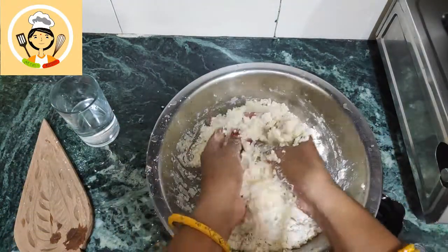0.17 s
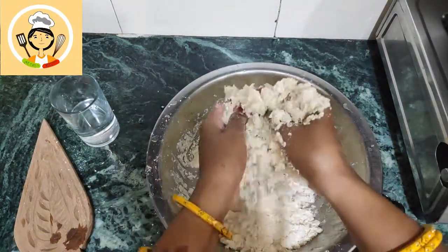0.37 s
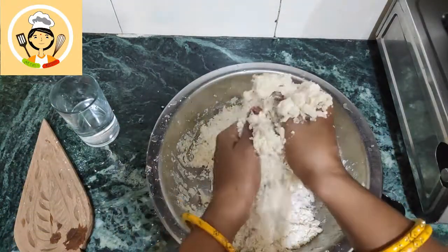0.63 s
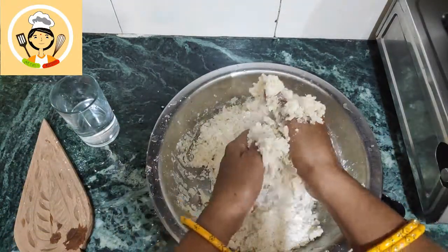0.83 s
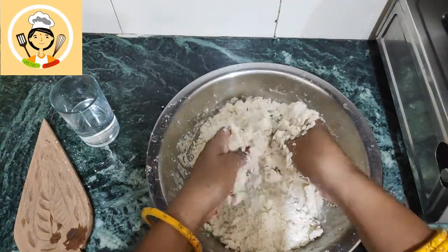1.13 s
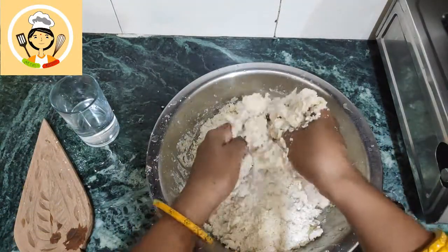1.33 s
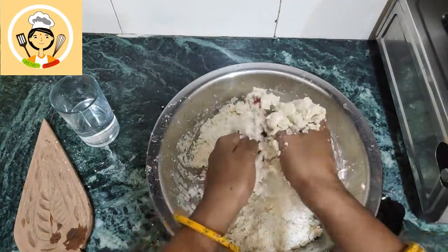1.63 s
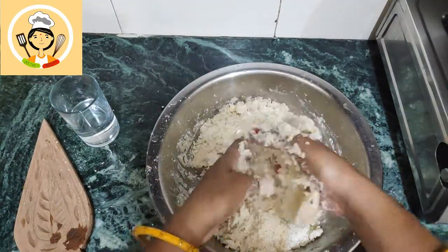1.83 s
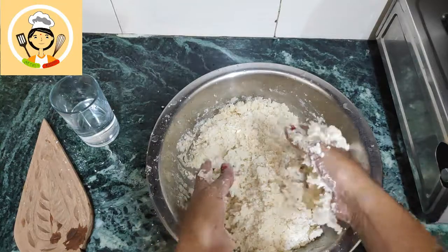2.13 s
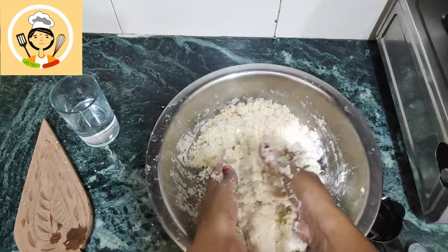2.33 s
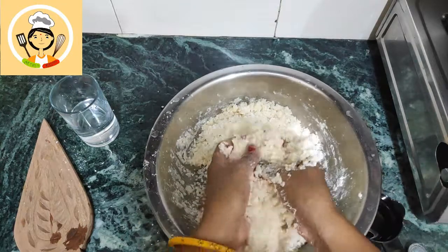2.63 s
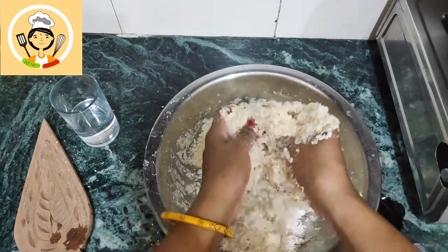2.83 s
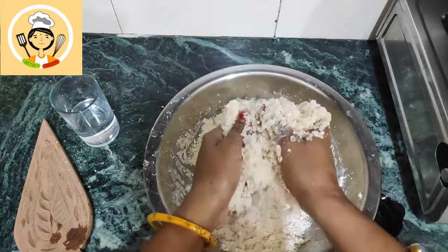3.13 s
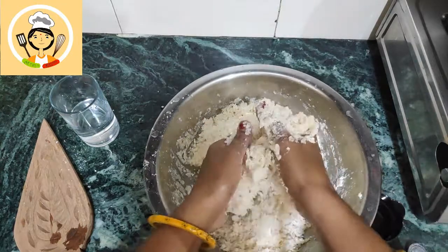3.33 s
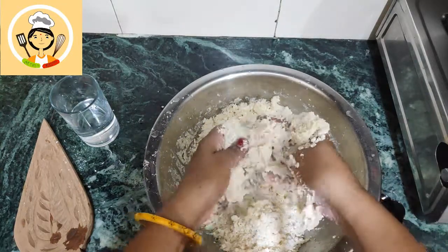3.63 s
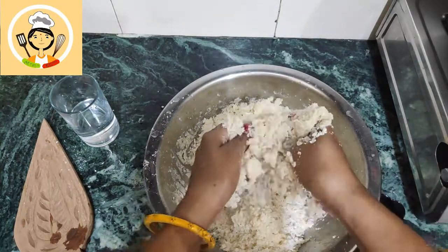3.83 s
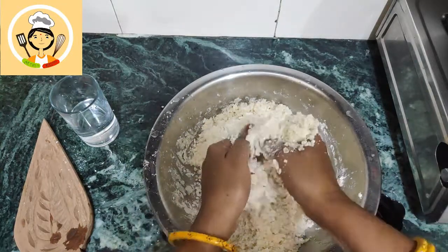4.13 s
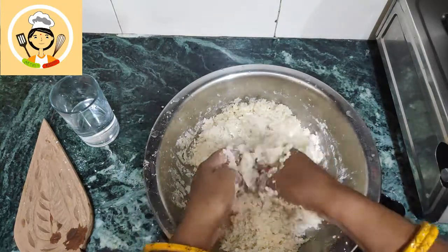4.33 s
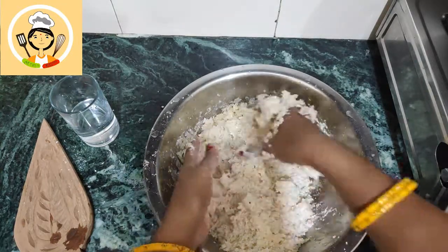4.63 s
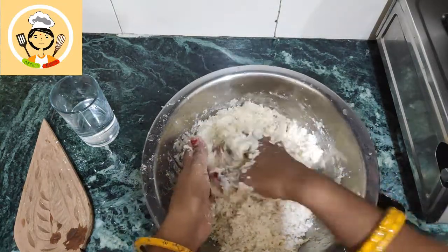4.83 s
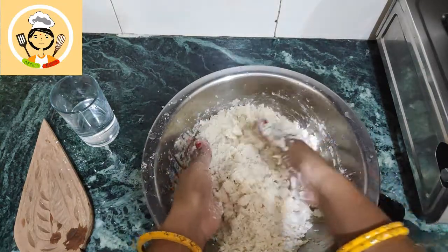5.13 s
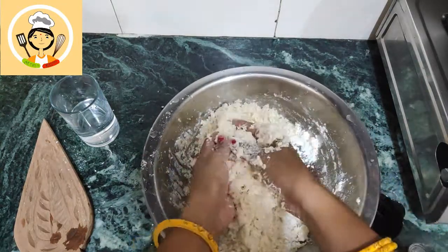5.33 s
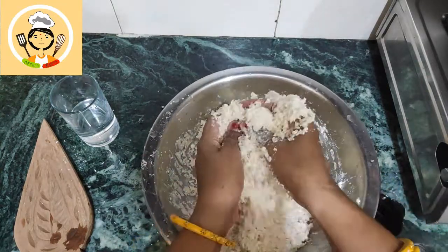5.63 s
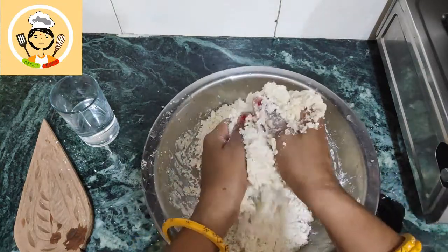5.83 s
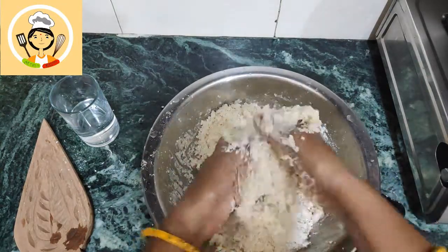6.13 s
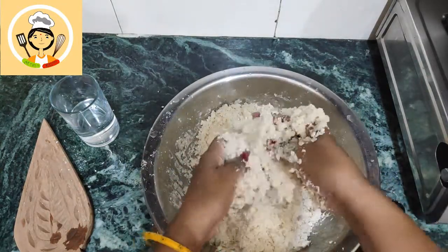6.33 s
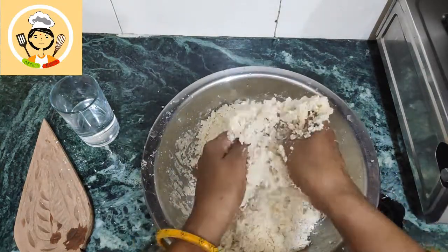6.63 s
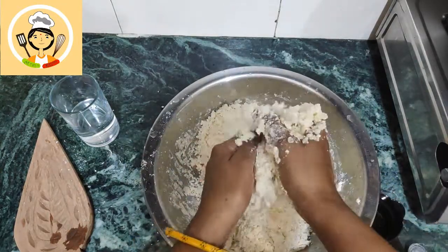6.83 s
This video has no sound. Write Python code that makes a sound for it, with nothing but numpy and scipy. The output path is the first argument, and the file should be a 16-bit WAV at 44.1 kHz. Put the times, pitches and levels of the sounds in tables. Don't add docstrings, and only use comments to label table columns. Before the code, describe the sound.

Two hard metallic clangs ring from a steel bowl, then hands softly rub crumbly flour mix with small ticks and clinks, ending in heavy scrapes on stone.

```python
import sys
import numpy as np
from scipy import signal
from scipy.fft import rfft, irfft, next_fast_len
from scipy.io import wavfile
from scipy.ndimage import uniform_filter1d

SR = 44100
rng = np.random.default_rng(int(sys.argv[2]) if len(sys.argv) > 2 else 0)


def boost_factor(decibels):
    exponent = np.asarray(decibels, float) / 20
    return 10 ** exponent


def log_audio(samples):
    frames = np.atleast_2d(samples).T
    limited = np.clip(frames, -1, 1)
    pcm = np.round(limited * 32767).astype(np.int16)
    wavfile.write(sys.argv[1], SR, pcm)


N = 307893


def evened(x):
    return x / np.sqrt(np.mean(x ** 2) + 1e-20)


def read(points, hz):
    f, value = np.transpose(points)
    return np.interp(np.log(hz + 1), np.log(f + 1), value)


def add(mix, s, sound):
    part = mix[round(s * SR):][:len(sound)]
    part += sound[:len(part)]


def coloured(x, points):
    size = next_fast_len(len(x) + 2048, real=True)
    gain = boost_factor(read(points, np.fft.rfftfreq(size, 1 / SR)))
    return irfft(rfft(x, size) * gain, size)[:len(x)]


# (frequency [Hz], level [dB per Hz])
HUM_COLOUR = [(30, -61), (62, -48), (80, -26), (134, -11), (254, -11), (420, -4), (545, -2), (680, -11),
              (950, -6), (1080, -10), (1250, -18.5), (2200, -24), (3800, -21), (4800, -31.5), (6500, -35.5)]
# (frequency [Hz], depth [dB])
HUM_DRIFT = [(500, 1.6), (1200, 3.2), (4000, 2.8), (5500, 1.5)]
# (frequency [Hz], width [Hz], level [dB])
ROOM_MODES = [(199.9, 17, 6), (326.6, 61, 1)]


def hum():
    frames, hz = N // 512 + 5, np.fft.rfftfreq(2048, 1 / SR)
    a, b, patches = rng.standard_normal((frames, 1025, 3)).T
    patches = uniform_filter1d(patches, 12, 0)
    patches = evened(uniform_filter1d(patches, 6, 1))
    modes = sum(boost_factor(db) / (1 + (2 * (hz - f) / width) ** 2) for f, width, db in ROOM_MODES)
    shape = boost_factor(read(HUM_COLOUR, hz)) + modes
    drift = boost_factor(read(HUM_DRIFT, hz)[:, None] * patches)
    z = (a + 1j * b) * shape[:, None] * drift
    return boost_factor(-61.8) * evened(signal.istft(z, nperseg=2048, noverlap=1536)[1][:N])


# (frequency [Hz], level [dB])
HISS_COLOUR = [(4000, -34), (6500, 4.5), (14000, 3), (15000, -9)]


def hiss():
    mid, side = (evened(coloured(x, HISS_COLOUR)) for x in rng.standard_normal((N, 2)).T)
    return boost_factor(-98.5) * (mid + boost_factor(-2) * np.outer([1, -1], side))


def rings(hz, db, t60, t, scatter_db):
    luck = rng.standard_normal((len(hz), 2))
    decay_db = (db + scatter_db * luck[:, 0])[:, None] - 60 * np.outer(1 / np.maximum(t60, .01), t)
    fade = np.float32(decay_db * np.log(10) / 20)
    turn = np.float32(2 * np.pi * np.outer(hz, t) + luck[:, 1:])
    x = (np.exp(fade) * np.sin(turn)).sum(0)
    return x / abs(x).max()


LOW_HZ = [600, 704, 730, 802, 858, 961, 1044]
MIDDLE_HZ = [1400, 1553, 1761, 2093, 2223, 2353, 2487, 2513, 2866, 3262, 3386]
HIGH_HZ = [3736, 3985, 4044, 4160, 4199, 4269, 4320, 4487, 4800, 4985, 5052, 5105, 5280, 5965, 6130]
# (level [dB], t60 [s])
LOW_RING = [(-0.5, 0.11), (-4.5, 0.54), (-3, 0.41), (-13.5, 0.12), (-5.5, 0.75), (-2.5, 0.45),
            (-14.5, 0.77)]
MIDDLE_RING = [(-24.5, 0.59), (-10.5, .25), (-10.5, 0.2), (-7, 0.3), (-15.5, 0.1), (-24.5, 0.085),
               (-7, 0.18), (-5.5, 0.49), (1, 0.1), (-18.5, .33), (-22, 0.78)]
HIGH_RING = [(-14, .3), (-8, .25), (1, 0.16), (-9, 0.23), (-7, .3), (-6, .15), (-5.5, 0.22), (-9, 0.38),
             (-9, 0.13), (-6, 0.21), (-0.5, 0.056), (-8, 0.11), (-12, 0.083), (-16.5, 0.44), (-19, .2)]


def knock(db, low_db, middle_db, high_db, free):
    t = np.arange(int(.36 * SR)) / SR
    ring = np.zeros(len(t))
    for hz, modes, family_db in [(LOW_HZ, LOW_RING, low_db), (MIDDLE_HZ, MIDDLE_RING, middle_db),
                                 (HIGH_HZ, HIGH_RING, high_db)]:
        mode_db, t60 = np.transpose(modes)
        ring += boost_factor(family_db) * rings(hz, mode_db, free * t60, t, 1.8)
    ring *= .33 + .67 * np.exp(-t / .013)
    colour = [(400, low_db - 21), (800, low_db), (1250, middle_db - 15.5), (2400, middle_db),
              (5000, high_db), (6200, high_db - 15), (8500, high_db - 15), (12500, high_db - 11)]
    crack_and_clang = np.exp(-t / .006) + .22 * np.exp(-t / (.05 * free))
    snap = coloured(rng.standard_normal(len(t)), colour) * crack_and_clang
    x = ring / abs(ring).max() + .7 * snap / abs(snap).max()
    return boost_factor(db) * x / abs(x).max() * (1 - np.exp(-t / .0005))


# (time [s], peak level [dB], low modes [dB], high modes [dB], freedom to ring [0-1])
KNOCKS = [(.0097, -10.5, -8, 7.5, 0.8), (.0155, -21.5, -5.5, 0, .7), (.0898, -7.8, -10.5, 6.5, 0.4),
          (0.418, -42.5, -2, 3.5, .6), (2.578, -41, 7.5, -22, 0.86), (2.638, -51, -28, -8, 0.87),
          (4.786, -24, -.5, -14, 1), (4.802, -30.5, 5, -18, 0.75), (5.2807, -29, -2, -10, .8),
          (5.346, -38.5, -3, -9, 0.4), (5.487, -43, -3, -8, 0.7), (5.524, -48, -14, 10, 0.05)]
# (frequency [Hz], level [dB])
BOWL_GAPS = [(1000, 0), (1200, -10), (1450, 1.5), (3000, -5), (3550, -3.5), (4000, 0), (5150, -1),
             (5600, -9.5)]


def bowl_knocks():
    out = np.zeros(N)
    for s, db, low_db, high_db, free in KNOCKS:
        add(out, s, knock(db, low_db, 0, high_db, free))
    return coloured(out, BOWL_GAPS + [(6100, 0.00036)])


def struck(db, hz, t60):
    t = np.arange(int(np.clip(t60, .05, .6) * SR)) / SR
    return boost_factor(db - 60 * t / t60) * np.sin(2 * np.pi * hz * t) * (1 - np.exp(-t / .001))


def low_thud():
    out = np.zeros(N)
    add(out, .011, struck(-48, 280, .15))
    return out


# (time [s], peak level [dB], frequency [Hz], t60 [s])
SWEET_SPOTS = [(0.012, -22, 2513, 0.085), (.0905, -31, 2514, .15), (4.787, -46, 1556, .2),
               (4.787, -49, 1760, .2), (.011, -32, 4064, .1), (0.092, -25, 2866, 0.1),
               (.0905, -35, 2092, 0.15), (.0905, -36, 4324, 0.084), (4.786, -47.5, 2092, 0.21),
               (4.786, -38.5, 2866, 0.067), (2.578, -59, 2092, 0.12), (2.578, -67, 2866, 0.081),
               (5.2815, -44.5, 2100, .12), (5.2815, -45, 2870, 0.14), (.0905, -37.5, 5130, 0.17),
               (.0905, -39, 859, .3), (0.0908, -46, 1759, 0.2), (4.79, -44.5, 860, .7),
               (4.79, -43, 958, .3), (4.79, -45, 705, .3), (5.282, -50, 721, .25), (5.282, -52, 965, .4),
               (1.1842, -69.5, 2513, 0.079), (1.1842, -70.5, 2866, .25), (2.578, -62, 3262, 0.095),
               (2.578, -70.5, 5105, 0.089), (2.578, -63, 2513, 0.1), (4.786, -49.5, 4320, 0.21),
               (4.786, -59, 5052, 0.28), (4.786, -86, 6130, 0.2), (5.487, -53, 2513, 0.068),
               (5.346, -46, 2093, .07), (4.786, -31, 2507, 0.089), (5.2814, -35, 4307, 0.08),
               (5.2818, -41, 2505, 0.1), (5.487, -62, 2100, 0.25), (5.49, -72, 6130, .25),
               (4.786, -66, 6130, .2), (.012, -34, 2866, .1), (.012, -40, 4800, .08),
               (.0905, -41, 4807, .12), (.5906, -67, 6130, .15), (.5906, -62, 5150, .12),
               (.5906, -54, 3290, .1), (.355, -58, 2513, .2), (.355, -60, 2866, .2), (.4, -58, 1553, .25),
               (2.578, -64, 4044, .06), (.8465, -66, 2513, .15), (1.2, -68, 2866, .3),
               (3.585, -66, 2740, .2), (1.924, -60, 2866, .1), (1.926, -65, 2093, .1)]


def sweet_spots():
    out = np.zeros(N)
    for s, db, hz, t60 in SWEET_SPOTS:
        add(out, s, struck(db, hz, t60))
    return out


# (frequency [Hz], t60 [s])
KITCHEN_DECAY = [(500, 0.59), (2000, .4), (4000, 0.32), (7000, 0.22), (12000, .3)]


def kitchen(x):
    taps = np.zeros(SR // 2)
    at = np.arange(150, len(taps) - 20, 20)
    taps[at + rng.integers(0, 20, len(at))] = rng.choice([-1., 1.], len(at))
    hz, t, z = signal.stft(taps, SR, nperseg=256)
    decay = boost_factor(-60 * t / read(KITCHEN_DECAY, hz)[:, None])
    tail = signal.istft(z * decay, SR, nperseg=256)[1]
    return signal.fftconvolve(x, tail / np.linalg.norm(tail))[:N]


def ping(db, hz, t60):
    t = np.arange(int(np.clip(.7 * t60, .05, .6) * SR)) / SR
    near_hz = hz + np.array([-95., -35., 0., 55.])
    near_db = np.array([-8., -4., 0., -4.])
    near_t60 = t60 * np.array([.7, 1, 1, .9])
    return boost_factor(db) * rings(near_hz, near_db, near_t60, t, 3.6) * (1 - np.exp(-t / 0.004))


def random_flickers(count=320):
    out = np.zeros(N)
    for when, pitch, size in rng.random((count, 3)):
        hz = 1150 * 4. ** pitch ** 2.3
        add(out, when * N / SR, ping(-74.5 - 1.6 * np.log(size), hz, .2))
    return out


def steel(x, db):
    hz, t = np.array(LOW_HZ + MIDDLE_HZ + HIGH_HZ), np.arange(int(.15 * SR)) / SR
    wall = np.sin(2 * np.pi * np.outer(t, hz)).sum(1) * boost_factor(-60 * t / .08)
    through = signal.fftconvolve(x, wall / np.linalg.norm(wall))[:N]
    return boost_factor(-1.5) * x + boost_factor(db) * through


def resonate(x, hz, width):
    turn = np.exp(2j * np.pi * np.cumsum(hz) / SR)
    f, t, z = signal.stft(x / turn, SR, nperseg=512, return_onesided=False)
    w = np.interp(t * SR, np.arange(len(x)), np.maximum(width, 100))
    narrowed = z / (1 + (2 * f[:, None] / w) ** 4)
    low = signal.istft(narrowed, SR, nperseg=512, input_onesided=False)[1]
    return (low[:len(x)] * turn).real


def grit(count):
    unevenness = evened(uniform_filter1d(rng.standard_normal(count), 150))
    return rng.standard_normal(count) * boost_factor(1.9 * unevenness)


def rub(rows):
    s, *columns = np.transpose(rows)
    t = np.arange(s[0], s[-1], 1 / SR)
    db, hz, width = (np.interp(t, s, c) for c in columns)
    x = evened(resonate(grit(len(t)), hz, width))
    return s[0], boost_factor(db - 0.5) * x * signal.windows.tukey(len(t), .06)


def flick(s, length, db, hz, width, rise, fade_db, sag_hz):
    return rub([(s, db - 12.5, hz, width), (s + rise, db, hz, width),
                (s + length, db + fade_db, hz - sag_hz * length, width)])


# (time [s], length [s], level [dB],
# centre [Hz], width [Hz])
FLICKS = [(0.36, 0.24, -56.5, 3870, 2200), (.25, .4, -64, 2400, 1500), (1.918, .05, -61, 4400, 1100),
          (5.281, .2, -57, 3200, 3200), (4.787, .22, -56, 2300, 2000), (5.487, .25, -66, 3200, 2200),
          (2.225, .12, -65, 4300, 1100), (.3, 0.6, -66, 1600, 150), (1.27, 0.11, -63, 4140, 800),
          (1.955, 0.2, -62.5, 3820, 3500), (3.221, .13, -64, 3727, 500), (3.591, .14, -63.5, 3570, 500),
          (4.397, 0.1, -55.5, 3070, 2070), (1.86, 0.091, -68.5, 3900, 600), (3.17, .17, -68, 2330, 250),
          (4.8, 0.19, -56, 4300, 2000), (0.09, .3, -61.5, 4400, 5000)]


def quick_rustles():
    out = np.zeros(N)
    for row in FLICKS:
        add(out, *flick(*row, rise=0.0082, fade_db=-23, sag_hz=600))
    return out


# (time [s], length [s], level [dB], centre [Hz], width [Hz])
DRAGS = [
    (0.284, 0.057, -59.5, 4330, 2190),
    (0.982, .14, -71.5, 3900, 553),
    (2.23, 0.3, -62.5, 3993, 880),
    (2.246, 0.16, -75, 2630, 935),
    (2.964, 0.084, -65.5, 3620, 493),
    (3.107, 0.12, -70, 3680, 500),
    (4.687, 0.18, -64.5, 4200, 820),
    (5.077, 0.23, -59.5, 3930, 2170),
    (5.1, 0.11, -74.5, 6050, 900),
]


def finger_drags():
    out = np.zeros(N)
    shape = (0, -13), (0.37, 0), (0.92, 0), (1, -9.5)  # (part of the stroke, dB)
    sag_hz = 1570
    for s, length, db, hz, width in DRAGS:
        rows = [(s + u * length, db + d, hz - sag_hz * u * length, width) for u, d in shape]
        add(out, *rub(rows))
    return out


def tick(db, low_hz, high_hz, t60, tilt_db):
    t, luck = np.arange(int(.18 * SR)) / SR, rng.random((14, 2))
    hz = low_hz + (high_hz - low_hz) * (np.arange(14) + luck[:, 0]) / 14
    wall = np.array(MIDDLE_HZ + HIGH_HZ)
    nearest = wall[abs(hz[:, None] - wall).argmin(axis=1)]
    pulled = nearest + .1 * (hz - nearest)
    hz = np.sort(np.where(abs(nearest - hz) < 150, pulled, hz))
    octaves = np.log2(hz / 3900)
    colour_db = tilt_db * octaves - 9 * abs(octaves)
    band = [(.93 * low_hz, -50), *zip(hz, colour_db), (1.05 * high_hz, -50)]
    spray = coloured(rng.standard_normal(len(t)), band) * boost_factor(-60 * t / (3.8 * t60))
    click = (.35 + .65 * np.exp(-t / .005)) * (1 - np.exp(-t / .0003))
    modes = rings(hz, colour_db, t60 * (.5 + luck[:, 1]), t, 5.5)
    return boost_factor(db) * (.7 * modes + .65 * spray / abs(spray).max()) * click


# (time [s], peak level [dB], ring t60 [s], tilt [dB per octave])
BANGLE_ON_BANGLE = [
    (.3052, -58, .16, 0),
    (.3436, -45, 0.087, -2),
    (.3541, -39, 0.086, -8),
    (1.1189, -44.5, 0.14, -5),
    (2.0228, -45.5, .064, -20),
    (4.6713, -47, 0.16, -13),
]
BANGLE_ON_RIM = [
    (.5906, -42, .04, -8),
    (1.924, -39, 0.06, 7),
    (1.9565, -38, 0.11, -5),
    (3.0555, -45, 0.06, -7),
    (3.1028, -41, 0.068, -8),
    (4.1589, -51, .04, -5.5),
    (4.400, -34.5, 0.054, -11.5),
]
NAIL_IN_HOLLOW = [(.5472, -50.5, .41, 2), (2.7003, -45.5, 0.084, 2), (2.9018, -50, 0.07, 6),
                  (2.9297, -43, 0.07, 4), (3.2271, -49.5, .12, 16), (3.5089, -46, 0.16, -6),
                  (3.5833, -48.5, 0.043, -4), (5.7448, -55.5, 0.37, 19), (5.9145, -55, 0.35, 4.5),
                  (5.9399, -55.5, 0.125, 1), (5.606, -52, 0.091, -5), (2.2821, -58, .06, 0),
                  (2.329, -56, .06, 0), (2.4473, -54, .06, 0), (3.025, -62, .06, 0), (3.1392, -61, .08, 0),
                  (.401, -52, .06, 0)]
NAIL_ON_WALL = [
    (.8465, -53, 0.099, -11),
    (1.2431, -46.5, 0.25, -10),
    (2.153, -53.5, .065, -19),
    (2.2288, -52, 0.2, -18),
    (6.2088, -64.5, .11, 9),
    (.9827, -54, .12, 21),
]
RING_ON_WALL = [
    (1.185, -49, .11, 5),
    (1.2655, -48, .12, -.5),
    (5.232, -50, .12, 1),
    (5.259, -43, .12, -2.5),
    (6.3555, -43, .12, -6),
]
KNUCKLE = [
    (1.0365, -49.5, 0.26, -12.5),
]
# (ticks, lowest [Hz], highest [Hz])
CONTACTS = [(BANGLE_ON_BANGLE, 3480, 6300), (BANGLE_ON_RIM, 2080, 6450), (NAIL_IN_HOLLOW, 2800, 4350),
            (NAIL_ON_WALL, 3760, 5270), (RING_ON_WALL, 2300, 5260), (KNUCKLE, 1200, 2700)]


def contact_ticks():
    out = np.zeros(N)
    for rows, low_hz, high_hz in CONTACTS:
        for s, db, t60, tilt_db in rows:
            add(out, s, tick(db, low_hz, high_hz, t60, tilt_db))
    return steel(out, -13)


def bangle_glint():
    out = np.zeros(N)
    add(out, .3541, tick(-39, 11500, 13800, .07, 6))
    return out


# (time [s], level [dB], length [s])
DULL_RUSTLES = [(0.363, -70, 0.27), (1.01, -71, .3), (1.37, -78.5, .15), (1.86, -80.5, .2), (2.17, -78, .15),
                (2.35, -69, 0.33), (2.58, -70, 0.3), (3.03, -68, 0.061), (3.204, -68.5, 0.48),
                (3.501, -67.5, 0.48), (4.123, -71, 0.18), (4.422, -71.5, 0.42), (4.93, -69, .35),
                (5.596, -75, 0.074), (5.692, -70.5, .25), (5.99, -78.5, 0.26), (6.198, -72.5, .2)]


def dull_rustles():
    out = np.zeros(N)
    for s, db, length in DULL_RUSTLES:
        add(out, *flick(s, length, db, hz=1320, width=580, rise=0.036, fade_db=-16.5, sag_hz=300))
    return out


def skin_squeak():
    out = np.zeros(N)
    add(out, *flick(.55, .6, -72, hz=3380, width=190, rise=0.031, fade_db=-10, sag_hz=150))
    return out


# (time [s], peak level [dB], frequency [Hz])
PINGS = [(.7163, -64, 3430), (.8135, -66, 3343), (.9448, -68, 3360), (1.8627, -64, 3965),
         (2.8225, -57, 3700), (3.4047, -63, 3580), (6.0631, -65, 3760), (6.2572, -67.5, 4260),
         (6.766, -65.5, 3310), (.5621, -63, 2480), (.8464, -65.5, 2523), (1.0051, -62, 1900),
         (1.4865, -65.5, 2325), (2.385, -67, 2516), (2.9272, -71.5, 2014), (3.1767, -63.5, 2336),
         (3.5853, -67, 2730), (3.8851, -65, 2340), (4.6872, -69, 2460), (5.5822, -62, 2146),
         (5.9794, -70, 2430), (6.115, -81, 2980), (.5896, -66, 5400), (2.7018, -73, 6130),
         (2.9846, -73, 5120), (3.2435, -71, 6050), (3.5099, -70.5, 5660), (3.903, -75, 6230),
         (6.2726, -74.5, 6200), (1.38, -66, 1450), (1.445, -71, 2800), (1.46, -70, 3600),
         (1.585, -70, 2300), (1.608, -68, 1480), (1.62, -70, 3550), (1.665, -72, 2800), (1.745, -70, 3650),
         (1.775, -71, 2100), (1.782, -69, 4200), (1.85, -71, 1900), (2.225, -74, 2100), (2.245, -70, 2800),
         (2.37, -72, 5350), (2.41, -72, 5600), (2.445, -76, 6200), (2.41, -67, 2830), (2.375, -66, 1480),
         (2.762, -66, 1300), (2.95, -73, 4900), (2.89, -69, 2870), (3.172, -67, 1900), (3.23, -68, 4400),
         (3.372, -69, 1800), (3.495, -70, 2250), (3.525, -64, 1520), (3.735, -68, 1500), (3.5, -70, 4400),
         (5.2, -66, 1900), (5.2, -68, 1550), (5.13, -68, 2900)]


def faint_pings():
    out = np.zeros(N)
    for s, db, hz in PINGS:
        add(out, s, boost_factor(2.5) * ping(db, hz, .14))
    return out


# (frequency [Hz], level [dB per Hz])
SCRAPE_COLOUR = [(290, -41), (500, -15), (632, -19.5), (726, -11.5), (1280, -7), (1420, -9), (2060, 0),
                 (2870, -7.5), (3990, -4), (5800, -22), (7400, -28), (8290, -61), (14000, -120)]


def scrape(rows):
    s, *columns = np.transpose(rows)
    t = np.arange(s[0], s[-1], 1 / SR)
    db, tilt = (np.interp(t, s, c) for c in columns)
    x = coloured(grit(len(t)), SCRAPE_COLOUR)
    dull = coloured(x, [(1500, 3), (2600, -34)])
    blend = boost_factor(-tilt) * dull + boost_factor(tilt) * (x - dull)
    return s[0], boost_factor(db) * blend / np.std(x) * signal.windows.tukey(len(t), .04)


# (time [s], peak level [dB], tilt from dull to bright [dB], length [s])
SCRAPES = [
    (6.392, -42.5, 0.5, .306),
    (6.876, -49.5, -4.5, .25),
]


def counter_scrapes():
    out = np.zeros(N)
    bite_s, swell_s, fade_db_per_s = 0.007, 0.03, 124.5
    top = bite_s + swell_s
    for s, db, tilt, length in SCRAPES:
        add(out, *scrape([(s, db - 25, tilt), (s + bite_s, db - 2, tilt - 1.5), (s + top, db, tilt),
                          (s + length, db - fade_db_per_s * (length - top), tilt - 4)]))
    return out


def scene():
    bowl = bowl_knocks()
    bangles = contact_ticks() + faint_pings() + sweet_spots() + bangle_glint()
    blows = bowl + bangles + kitchen(boost_factor(-7.0) * bowl + boost_factor(-9.0) * bangles)
    rubs = quick_rustles() + skin_squeak() + finger_drags() + dull_rustles()
    friction = steel(rubs, -14) + counter_scrapes()
    room = hum() + random_flickers() + low_thud()
    near = coloured(blows + friction, [(150, -41), (450, 1)])
    mono = near + coloured(room, [(30, -3), (62, -7), (80, 0)])
    return np.array([mono, mono])


# (frequency [Hz], level [dB])
MIC_COLOUR = [(5500, 0), (6400, 0.5), (6900, -16), (9000, -19.5), (12000, -25.5), (13800, -27),
              (14400, -60.5)]


def microphone(x):
    return coloured(x, MIC_COLOUR)


# (frequency [Hz], level [dB])
SHUT_DEPTH = [(950, 0), (1200, -10), (1700, -13), (3000, -11), (6500, -11)]


def noise_suppressor(x):
    hz, t, z = signal.stft(x, SR, nperseg=512, noverlap=384)
    power = uniform_filter1d(abs(z) ** 2, size=3, axis=0)
    power = uniform_filter1d(power, size=7, axis=1, origin=2) + 1e-24
    over_db = 10 * np.log10(power / np.percentile(power, 30, axis=1, keepdims=True))
    fall = 120.0 * t
    held_db = np.maximum.accumulate(np.minimum(over_db, 16.) + fall, axis=1) - fall
    shut = 1 / (1 + np.exp((held_db - 7.5) / 1.4))
    learnt_db = np.outer(hz > 7000, -22. * (1 - np.exp(-(t / .55) ** 3)))
    gain = boost_factor(shut * read(SHUT_DEPTH, hz)[:, None] + learnt_db)
    return signal.istft(z * gain, SR, nperseg=512, noverlap=384)[1][:N]


def low_pass(x):
    return signal.sosfilt(signal.butter(12, 14300, fs=SR, output="sos"), x)


def record(dry):
    mono = noise_suppressor(microphone(dry[0]))
    mix = mono + hiss()
    return low_pass(mix)


dry = scene()
out = record(dry)
log_audio(out)
```